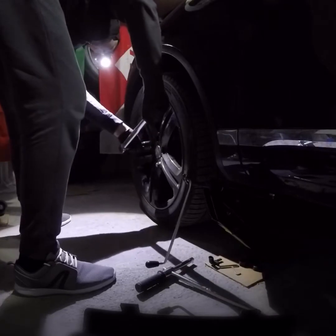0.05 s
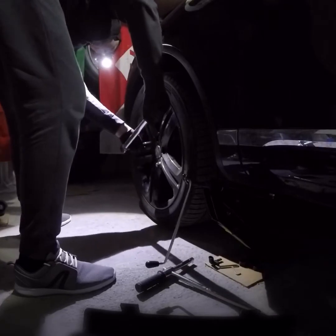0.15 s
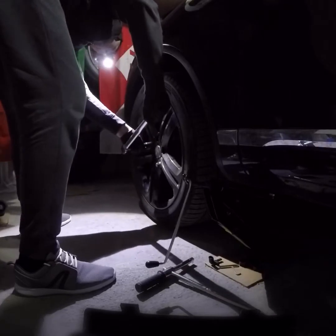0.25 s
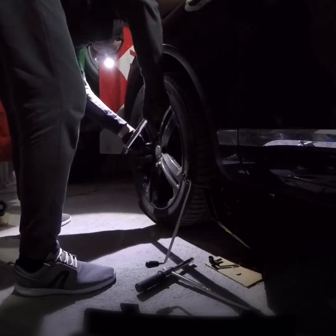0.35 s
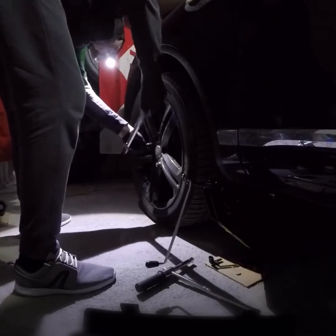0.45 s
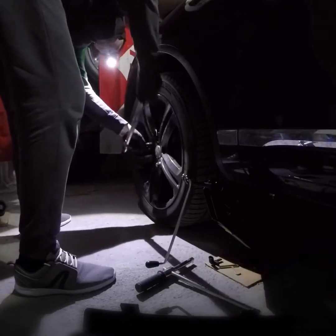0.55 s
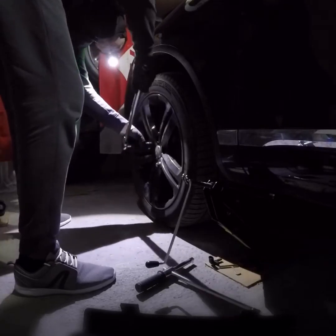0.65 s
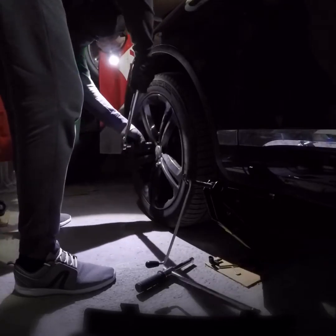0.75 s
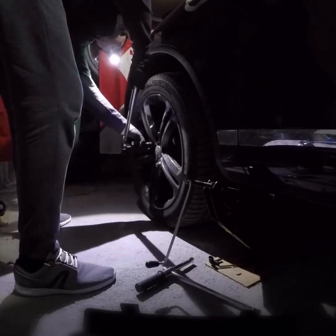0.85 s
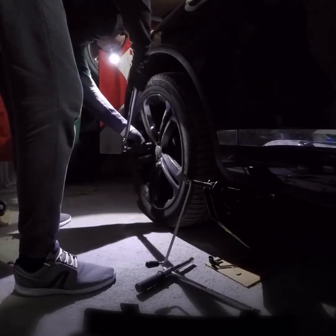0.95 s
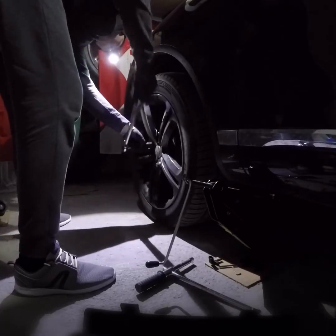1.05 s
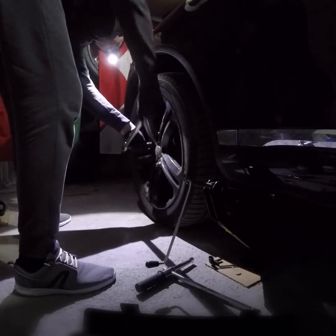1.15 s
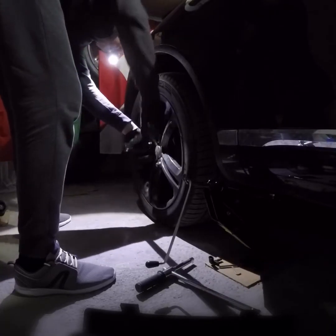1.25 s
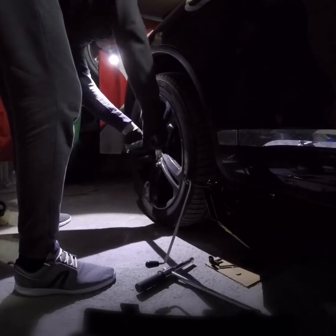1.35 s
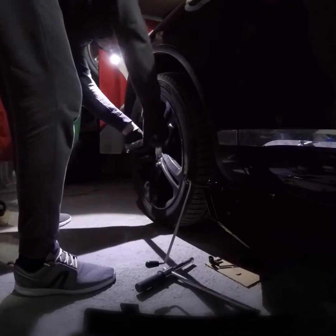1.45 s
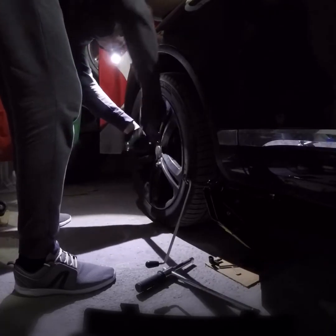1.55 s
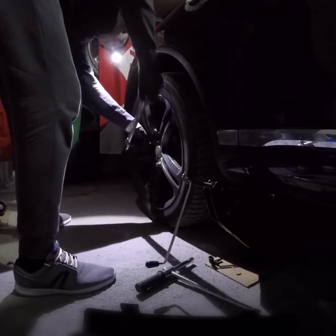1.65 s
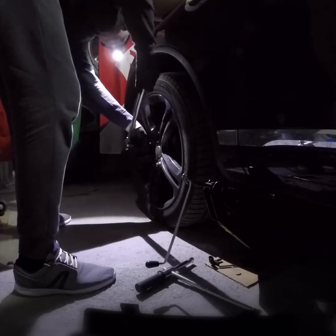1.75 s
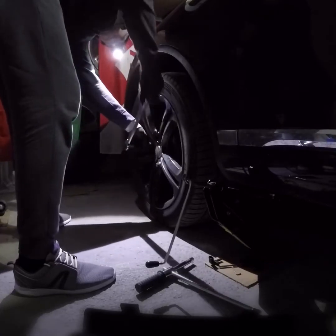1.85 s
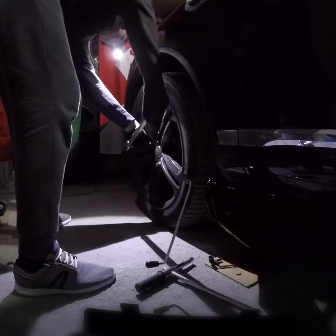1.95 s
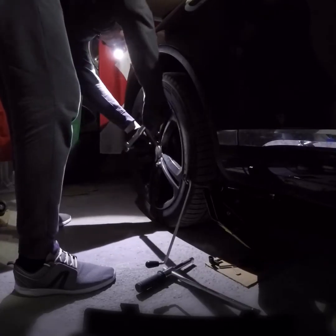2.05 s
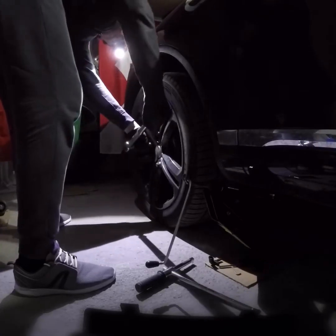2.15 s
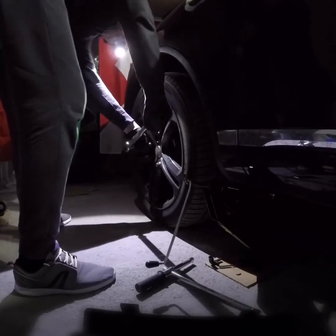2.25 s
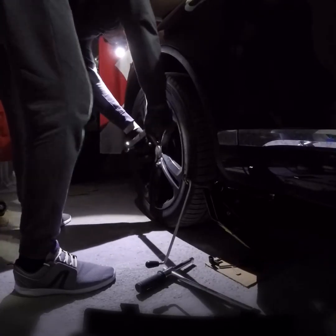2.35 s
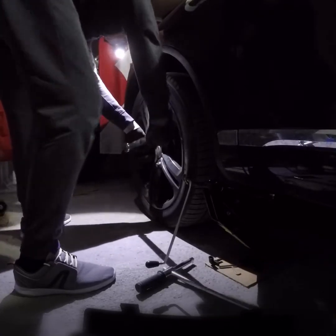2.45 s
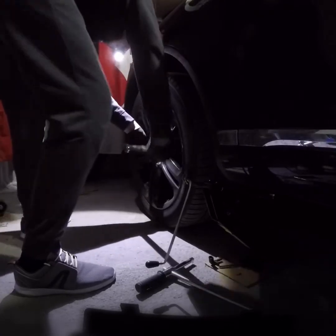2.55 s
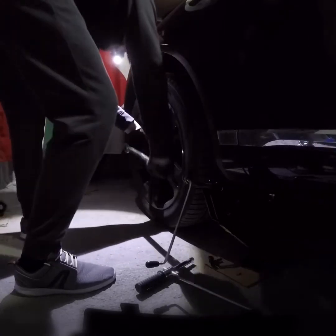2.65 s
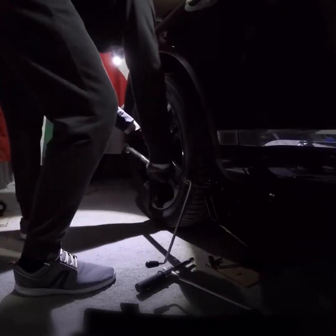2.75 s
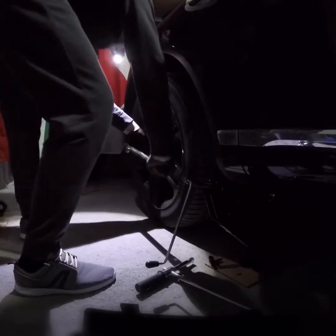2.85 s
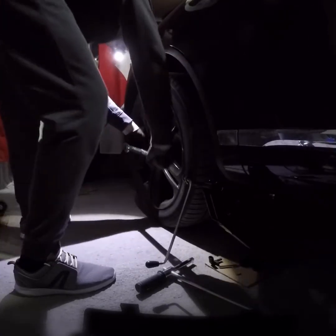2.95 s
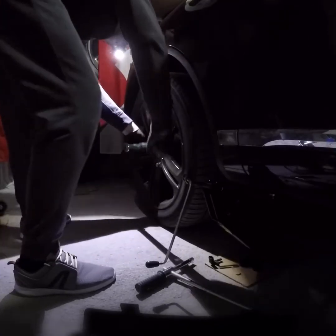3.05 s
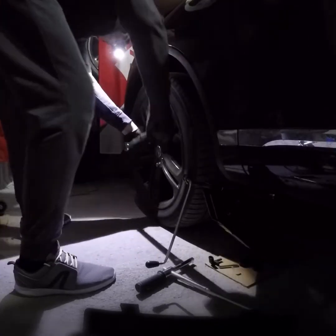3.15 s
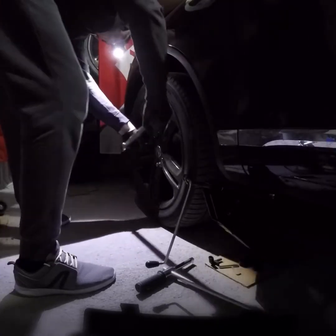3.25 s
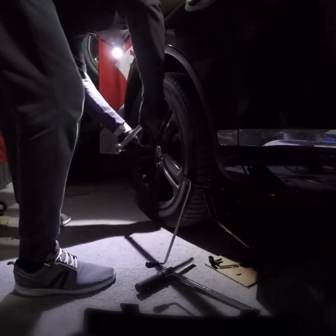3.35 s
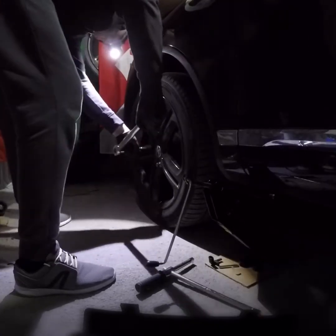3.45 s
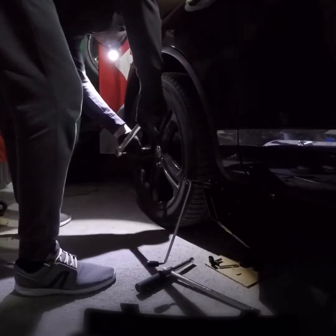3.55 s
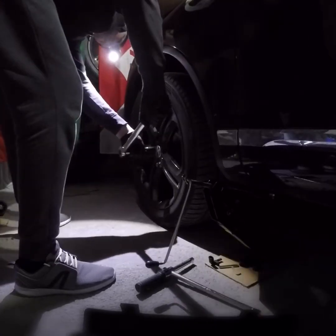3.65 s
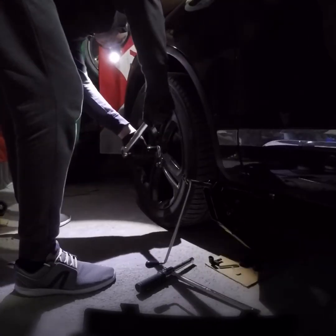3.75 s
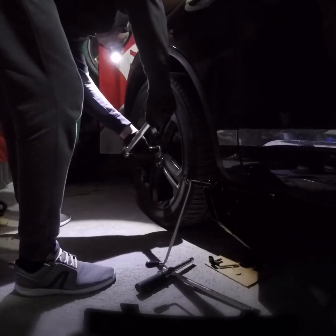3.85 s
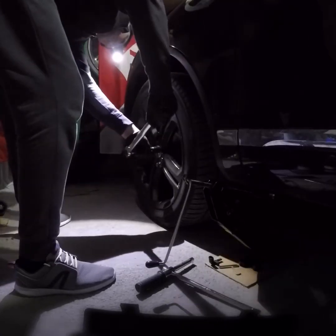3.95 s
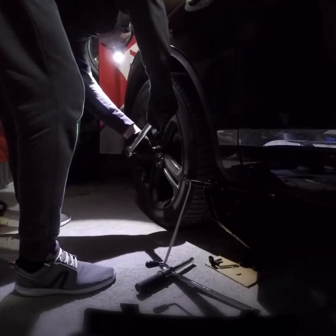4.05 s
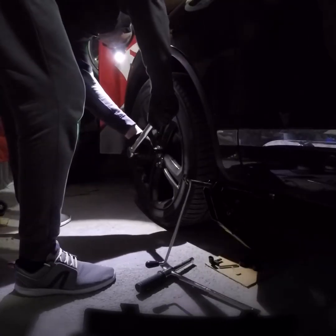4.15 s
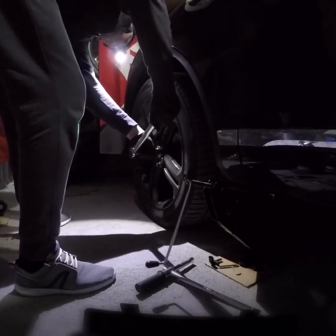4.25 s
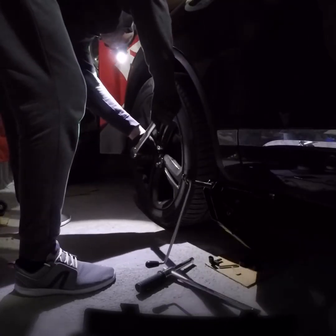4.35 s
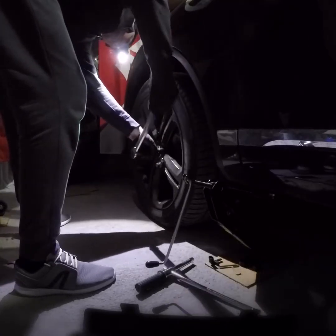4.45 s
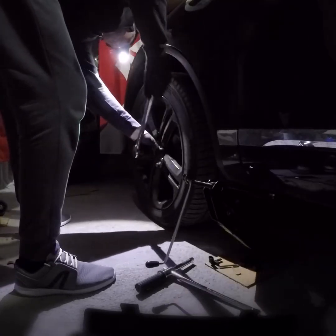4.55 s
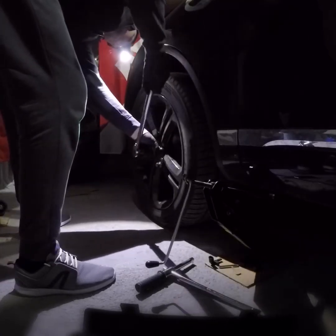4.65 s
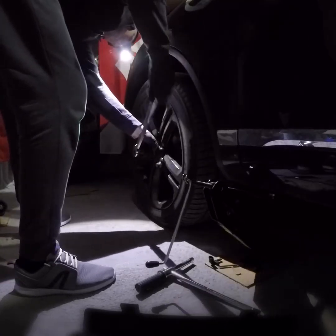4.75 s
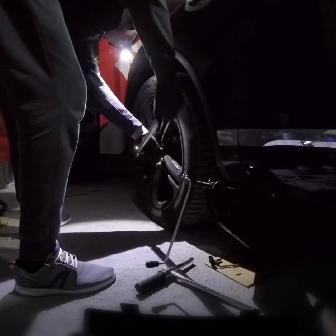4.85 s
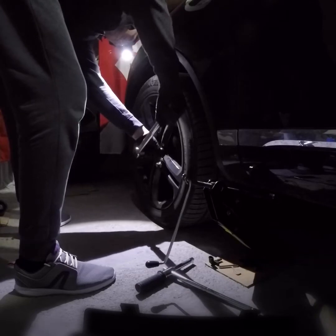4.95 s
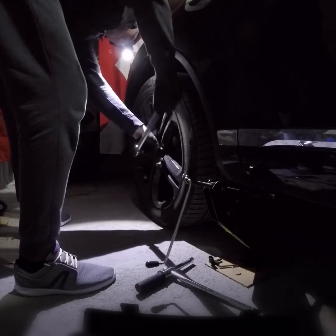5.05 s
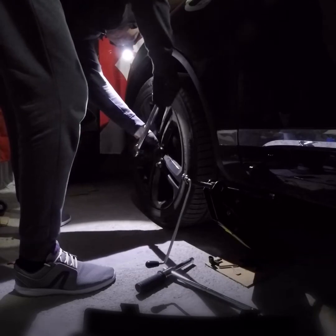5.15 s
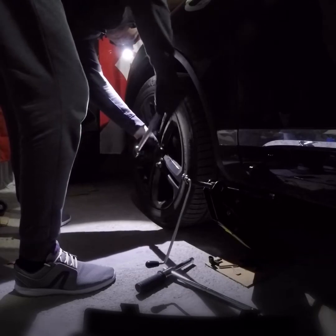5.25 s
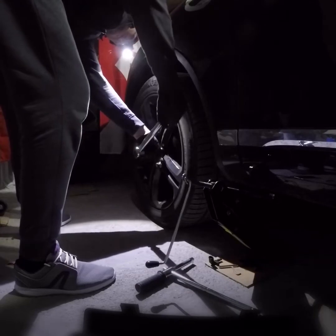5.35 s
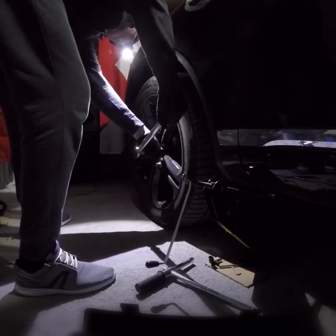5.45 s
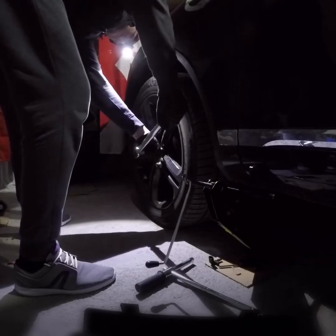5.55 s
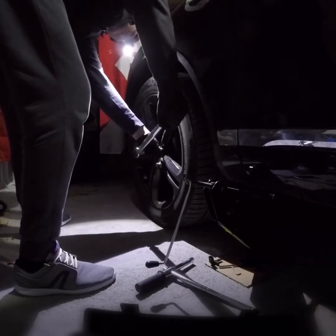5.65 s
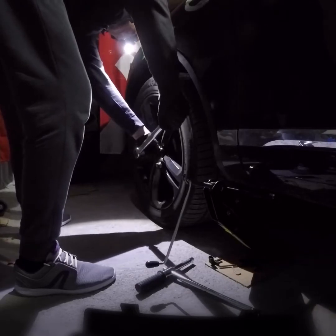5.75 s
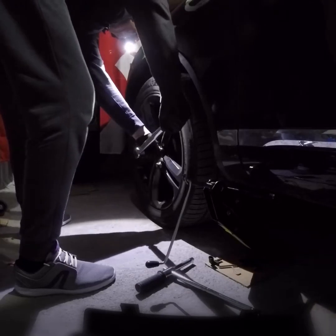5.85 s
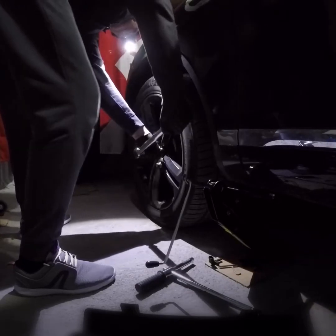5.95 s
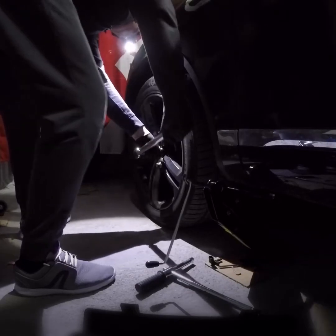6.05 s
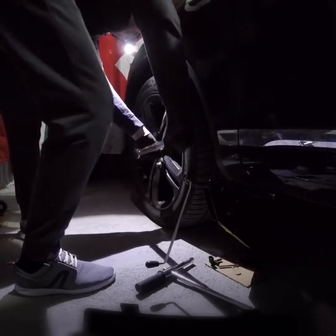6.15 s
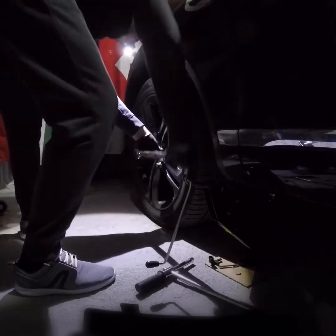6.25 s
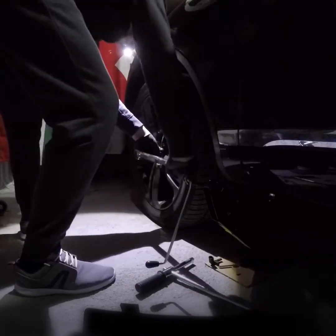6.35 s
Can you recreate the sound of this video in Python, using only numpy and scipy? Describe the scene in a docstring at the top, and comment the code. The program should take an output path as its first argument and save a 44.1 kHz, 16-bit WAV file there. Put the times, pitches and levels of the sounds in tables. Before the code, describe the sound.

Faint metal ticks and scrapes around two hard, briefly ringing clicks of a torque wrench tightening car wheel bolts in a small garage.

```python
"""First comes the room tone of a small garage: rumble, hiss, faint whines and a thin electronic whistle.
A socket scrapes and ticks on the wheel bolts, then a click-type torque wrench goes to work.
It breaks over twice with a hard steel snap; in between it springs back and the socket knocks.
Each blow rings the tool and the alloy wheel, and the walls answer. The brake disc pings under load,
and a faint metallic singing hangs between the hits."""
import sys
import numpy as np
from scipy import signal
from scipy.fft import rfft, irfft, next_fast_len
from scipy.io import wavfile

SR = 44100
rng = np.random.default_rng(int(sys.argv[2]) if len(sys.argv) > 2 else 0)


def inscribe(sig):
    """Save sig as 16-bit PCM at rate SR to the path in sys.argv[1].

    A 1-D sig is mono; a 2-D sig holds one channel per row.
    Samples are clipped to [-1, 1] before scaling.
    """
    pcm = np.round(np.clip(np.atleast_2d(sig).T, -1, 1) * 32767)
    wavfile.write(sys.argv[1], SR, pcm.astype(np.int16))


N = 281799
TIME = np.arange(N) / SR
AGE = np.arange(int(.6 * SR)) / SR  # seconds since a hit

# EQ curve of the rumble and hiss: (frequency [Hz], relative level [dB])
AIR_EQ = [(12, -11), (22, 0.5), (40, -2.5), (90, -9.5), (200, -18), (450, -22), (1000, -25.5), (2400, -25),
          (3500, -27.5), (4600, -27), (6800, -31.5), (8000, -34.5), (14000, -38)]
# the socket sliding on or off a bolt: (time [s], length [s], level [dB])
SOCKET_SLIDES = [(0.328, 0.071, -67), (1.798, 0.21, -72), (3.81, .13, -66.5), (5.45, .07, -70)]
# modes of the alloy wheel: (frequency [Hz], relative level [dB], t60 [s])
WHEEL_MODES = [(2290, -6, 0.035), (2753, -4, 0.054), (2870, -9.5, 0.084), (2977, -5, 0.051),
               (3136, -2, 0.04), (3280, -10, 0.022)]
# the loose socket ticking on its drive: (time [s], level [dB])
SOCKET_TICKS = [(0.362, -70.5), (0.668, -71), (1.182, -64.5), (1.715, -68), (4.625, -68), (4.963, -63),
                (5.038, -64.5), (5.13, -69.5)]
# modes around the main bend of socket and extension: (frequency [Hz], relative level [dB], t60 [s])
TOOL_SIDE_MODES = [(3734, -0.5, 0.014), (3935, -4.5, 0.031), (3995, -4.5, 0.039), (4190, -1.5, 0.053),
                   (4262, -3.5, 0.034), (4420, -3, 0.019), (4660, -3, 0.028)]
# overtones of socket and extension: (frequency [Hz], relative level [dB], t60 [s])
TOOL_OVERTONES = [(6590, -7, .025), (6750, -3, .025), (6870, 0, .03), (7000, 0, .025), (7120, -1, .025),
                  (7250, -4, .025)]
# EQ curve of the dull body of a contact: (frequency [Hz], relative level [dB])
KNOCK_EQ = [(100, -39), (500, -22.5), (900, -17), (1250, -6), (1600, -4.5), (1850, 2.5), (2500, -0.5),
            (3500, -8), (4500, 0), (5100, -3.5), (5600, -12), (8000, -12), (16000, -73)]
# EQ curve of its bright edge: (frequency [Hz], relative level [dB])
SNAP_EQ = [(1000, -20), (3500, -4), (5100, -1.5), (6400, -1), (7600, -8), (8150, -8), (8600, -2),
           (9500, -4), (11000, -6), (12300, -10), (14500, -13), (16500, -18)]
# wrench blows; the two hardest are the break-overs, and the grip sets the main mode's pitch and decay:
# (time [s], strength [dB], pitch [Hz], t60 [s], knock trim [dB], wheel trim [dB], snap trim [dB])
WRENCH_BLOWS = [(1.4633, -60, 4150, .05, -5, 1.5, -14), (1.589, -58.5, 4690, .09, -10.5, -5.5, -5.5),
                (2.5916, -34.5, 4117, .05, -11, -6, -11.5), (2.8194, -45.5, 4340, 0.052, -7.5, -.5, -12.5),
                (3.096, -57.5, 4125, .03, -7.5, -2.5, -13.5), (3.167, -59.5, 4280, .04, -6.5, -8.5, -20),
                (4.2764, -61, 4400, .17, 0, -4.5, -26), (4.515, -61, 4180, .03, 1.5, -1, -16),
                (5.016, -64, 4200, .04, -3, -2.5, -16), (6.1803, -32.5, 4170, .05, -12, -9, -11.5)]
# thin pings as the handle swings free: (time [s], pitch [Hz], level [dB])
PAWL_PINGS = [(1.589, 9500, -71), (2.8195, 10300, -62)]
# lingering metallic resonances: (frequency [Hz], width [Hz], relative level [dB])
SINGING_RESONANCES = [(1130, 25, -9), (3060, 300, 0), (4280, 380, -3)]
# the brake disc as the wheel is loaded and let go: (time [s], level [dB])
DISC_PINGS = [(2.596, -60), (2.83, -62)]


def undb(db):
    """Decibels to gain."""
    return 10 ** (np.asarray(db) / 20)


def unit(x):
    """Scale to rms 1."""
    return x / np.sqrt(np.mean(x ** 2))


def fade(t60):
    """Exponential tail, 60 dB down after t60 seconds."""
    return np.exp(-np.log(1000) * AGE / t60)


def ramp(start_s, length_s):
    """A linear fade from 0 to 1."""
    return np.clip((TIME - start_s) / length_s, 0, 1)


def add(out, time_s, sound):
    """Drop a sound onto a track."""
    start = int(time_s * SR)
    out[start:start + len(sound)] += sound[:N - start]


def colour(x, curve):
    """Minimum-phase EQ, so nothing rings ahead of an attack."""
    size = 2 * next_fast_len(len(x))
    hz, db = np.transpose(curve)
    grid = np.maximum(np.fft.rfftfreq(size, 1 / SR), 1)
    gain = undb(np.interp(np.log(grid), np.log(hz), db))
    cepstrum = irfft(np.log(gain))
    cepstrum[1:size // 2] *= 2
    cepstrum[size // 2 + 1:] = 0
    return irfft(rfft(x, size) * np.exp(rfft(cepstrum)))[:len(x)]


def band(hz, width_hz):
    """Noise in one resonance, rms 1; at 0 Hz it is a random wobble."""
    grid = np.fft.rfftfreq(N, 1 / SR)
    rolloff = 1 + ((grid - hz) / width_hz * 1.39) ** 2
    return unit(irfft(rfft(rng.standard_normal(N)) / rolloff, N))


def room_tone():
    """A bed of rumble, hiss and wavering hum; two faint whines die away while a high one stays."""
    air = undb(-62.5) * unit(colour(rng.standard_normal(N), AIR_EQ))
    hum_hz = 30 + 2 * band(0, width_hz=3.48)
    hum = undb(-69) * np.sqrt(2) * np.sin(2 * np.pi * np.cumsum(hum_hz) / SR)
    whines = band(2064, width_hz=44) + undb(-6) * band(716, width_hz=13)
    whine_gain = undb(-78) * (1 - ramp(start_s=3.57, length_s=.45))
    high_whine = undb(-93) * band(8560, width_hz=100)
    return air + hum + whine_gain * whines + high_whine


def electronic_whistle(pulse_rate_hz=30, drop_share=.11, flicker_db=3, sag_db_per_s=.7):
    """Electronics whistle in thin, flickering pulses, each ending in a quick dive of pitch."""
    cycle = (TIME - .009) * pulse_rate_hz % 1
    drop = np.clip((cycle - 1) / drop_share + 1, 0, 1)
    hz = 15150 - 1000 * drop + 120 * band(0, width_hz=150)
    second_half = np.clip(2 * cycle - 1, 0, 1)
    pulse = np.sqrt(np.abs(np.sin(np.pi * second_half)))
    level_db = -67 - sag_db_per_s * TIME + flicker_db * band(0, width_hz=24)
    return undb(level_db) * pulse * np.sin(2 * np.pi * np.cumsum(hz) / SR)


def socket_scrapes(slips_per_s=1500, grain_hz=(1800, 4800)):
    """Steel slides on steel: swells of tiny random slips, which also stir the wheel."""
    slips = rng.standard_normal(N) * (rng.random(N) < slips_per_s / SR)
    grain = unit(signal.sosfilt(signal.butter(2, grain_hz, "band", fs=SR, output="sos"), slips))
    wheel = unit(signal.fftconvolve(slips, ring(WHEEL_MODES))[:N])
    swells = sum(undb(db) * np.sin(np.pi * ramp(time_s, length_s))
                 for time_s, length_s, db in SOCKET_SLIDES)
    return unit(grain + undb(-5) * wheel) * swells


def ring(modes, detune=.00054):
    """Struck metal: decaying modes, with fresh tuning and phase on every hit."""
    out = np.zeros(len(AGE))
    for hz, db, t60 in modes:
        pitch_hz = hz * (1 + detune * rng.standard_normal())
        phase = rng.uniform(0, 2 * np.pi)
        out += undb(db) * fade(t60) * np.sin(2 * np.pi * pitch_hz * AGE + phase)
    return out


def build_up(rise_s=.0006):
    """The attack of a ring: vibration takes a moment to spread through the metal."""
    return 1 - np.exp(-AGE / rise_s)


def burst(t60):
    """A short run of random pulses with an even spectrum and energy 1."""
    pulses = rng.standard_normal(len(AGE)) * fade(t60)
    for _ in range(3):
        flat_spectrum = np.exp(1j * np.angle(rfft(pulses)))
        pulses = irfft(flat_spectrum, len(AGE)) * (AGE < t60)
    return pulses / np.linalg.norm(pulses)


def crack(curve, t60):
    """The transient of a contact: dense, heavily damped vibration."""
    return colour(burst(t60), curve)


def garage(x, floor_s=.0024, wall_s=.0074):
    """The room answers: a shaded direct path, a strong floor bounce, the near wall, a diffuse tail."""
    def delayed(echoes, delay_s, db):
        """One group of echoes with its pre-delay and level."""
        return undb(db) * np.pad(echoes / np.linalg.norm(echoes), (int(delay_s * SR), 0))[:len(AGE)]

    def diffuse(t60, db):
        """Dense echoes from all sides."""
        return delayed(rng.standard_normal(len(AGE)) * fade(t60), wall_s, db)

    lowpass, highpass = (signal.butter(2, 7500, kind, fs=SR, output="sos") for kind in ("low", "high"))
    paths = delayed(burst(t60=.04), floor_s + wall_s, db=-4)  # near wall
    paths += diffuse(t60=.23, db=-4)
    paths += signal.sosfilt(lowpass, diffuse(t60=.46, db=-7))
    paths += signal.sosfilt(highpass, diffuse(t60=.075, db=-7))
    paths[0] += undb(-13)  # direct path
    paths[int(floor_s * SR)] += 1
    wet = signal.fftconvolve(x, paths)[:len(AGE)]
    return wet / np.sqrt(np.mean(wet[:SR // 20] ** 2))  # rms 1 over the first 50 ms


def socket_ticks(pitch_hz=4190, t60=.03, lead_s=.0021):
    """Light contacts, too weak for the wheel, ring the tool at a pitch that shifts with the grip."""
    out = np.zeros(N)
    for time_s, db in SOCKET_TICKS:
        layers = [(ring([(pitch_hz, 0, t60)] + TOOL_SIDE_MODES, detune=.013) * build_up(), 0),
                  (ring(TOOL_OVERTONES) * build_up(), -14),
                  (crack(KNOCK_EQ, t60=.018), -7),
                  (crack(SNAP_EQ, t60=.014), -14)]
        for layer, trim_db in layers:
            add(out, time_s - lead_s, undb(db + trim_db) * garage(layer))
    return out


def wrench_blows(break_over_db=-31, lead_s=.0023):
    """Each blow knocks and snaps at the contact, and rings the tool and the wheel."""
    out = np.zeros(N)
    for time_s, db, pitch_hz, t60, knock_db, wheel_db, snap_db in WRENCH_BLOWS:
        overtone_db = -2.5 + .36 * (db - break_over_db)  # harder hits ring brighter
        layers = [(ring([(pitch_hz, 0, t60)] + TOOL_SIDE_MODES) * build_up(), -.6),
                  (ring(TOOL_OVERTONES) * build_up(), overtone_db),
                  (ring(WHEEL_MODES) * build_up(), wheel_db),
                  (crack(KNOCK_EQ, t60=.028), knock_db + 3),
                  (crack(SNAP_EQ, t60=.022), snap_db + 5)]
        for layer, trim_db in layers:
            add(out, time_s - lead_s, undb(db + trim_db) * garage(layer))
    return out


def pawl_pings(t60=.08):
    """One small, high mode, likely the ratchet pawl, outlasts the snap."""
    out = np.zeros(N)
    for time_s, pitch_hz, db in PAWL_PINGS:
        add(out, time_s, undb(db) * garage(ring([(pitch_hz, 0, t60)])))
    return out


def metallic_singing(waver_db=2.5):
    """Narrow resonances swell, shimmer faintly while the wheel is worked, and fade."""
    fade_in = ramp(start_s=2.46, length_s=.28)
    fade_out = 1 - ramp(start_s=4.96, length_s=2.1)
    shimmer = sum(undb(db + waver_db * band(0, width_hz=8.3)) * band(hz, width_hz)
                  for hz, width_hz, db in SINGING_RESONANCES)
    return undb(-72) * fade_in * fade_out * unit(shimmer)


def brake_disc(pitch_hz=1128, t60=.058):
    """One low mode of the disc blooms and fades as the wheel is loaded and let go."""
    out = np.zeros(N)
    for time_s, db in DISC_PINGS:
        ping = ring([(pitch_hz, 0, t60)]) * build_up(rise_s=.0056)
        add(out, time_s, undb(db) * garage(ping))
    return out


def scene():
    """The mono mix: hits up front, soft textures and the room bed underneath."""
    hits = wrench_blows() + socket_ticks() + brake_disc() + pawl_pings()
    textures = socket_scrapes() + metallic_singing()
    bed = room_tone() + electronic_whistle()
    return (hits + textures + bed)[None]


def record(dry):
    """A steep high cut at 15.5 kHz on the whole mix."""
    return signal.sosfilt(signal.ellip(10, .2, 70, 15500, fs=SR, output="sos"), dry)


dry = scene()
out = record(dry)
inscribe(out)
```